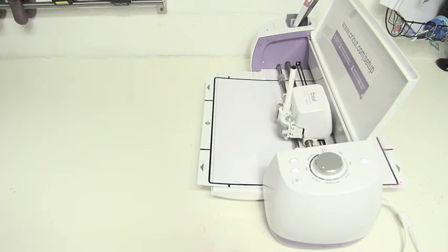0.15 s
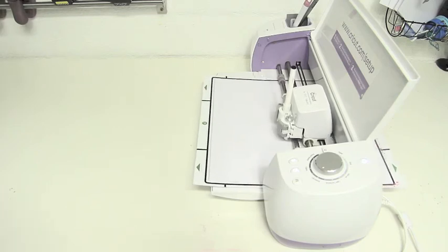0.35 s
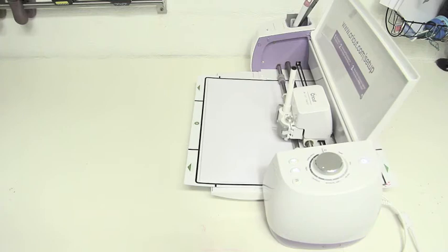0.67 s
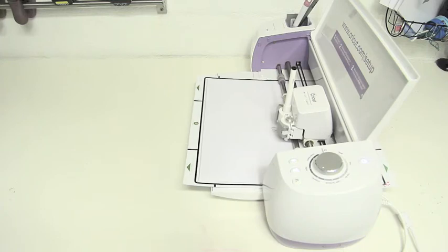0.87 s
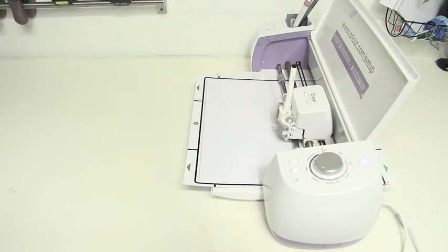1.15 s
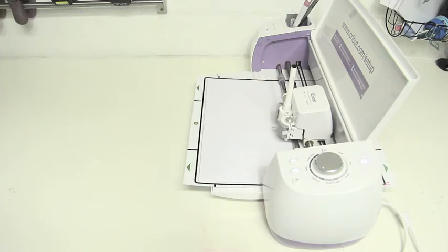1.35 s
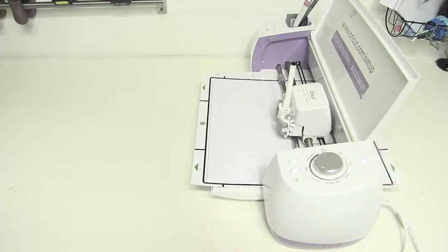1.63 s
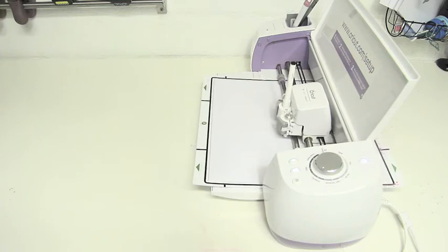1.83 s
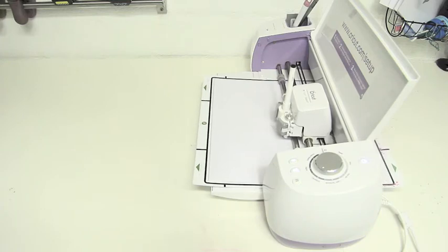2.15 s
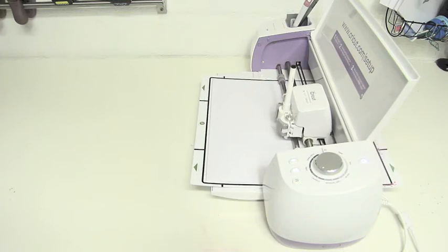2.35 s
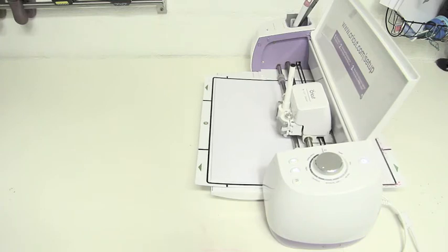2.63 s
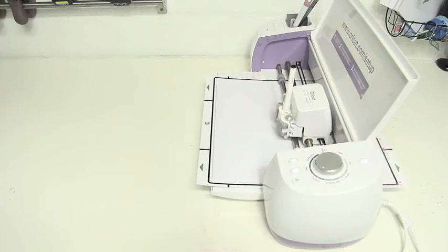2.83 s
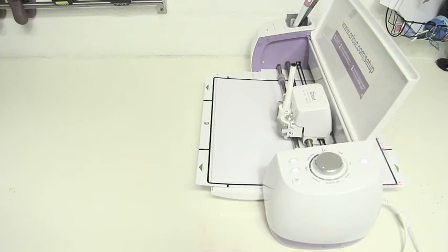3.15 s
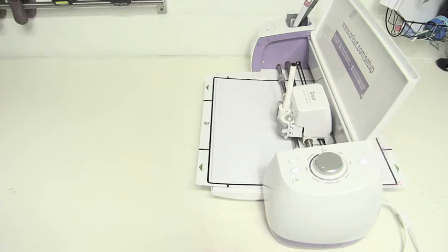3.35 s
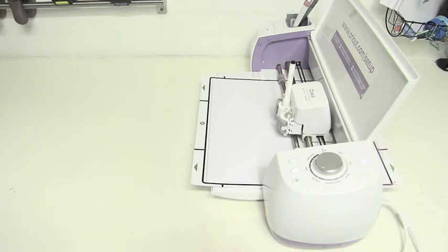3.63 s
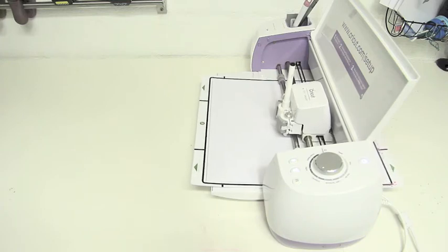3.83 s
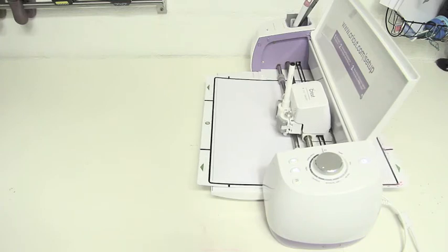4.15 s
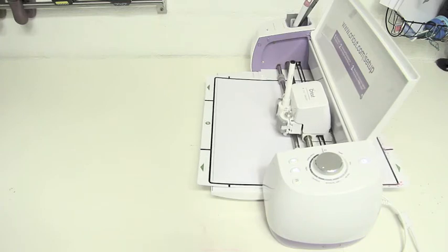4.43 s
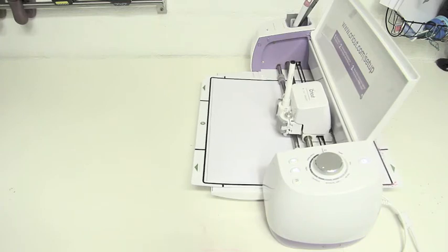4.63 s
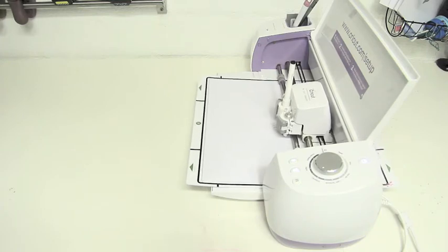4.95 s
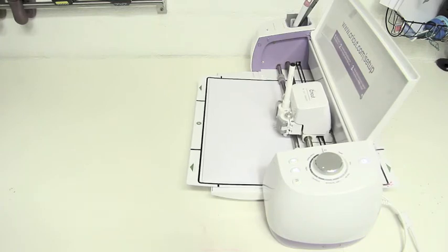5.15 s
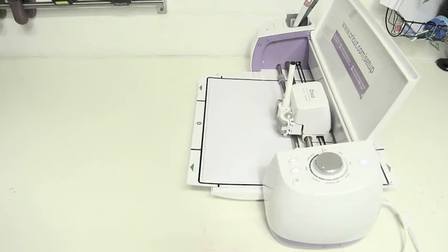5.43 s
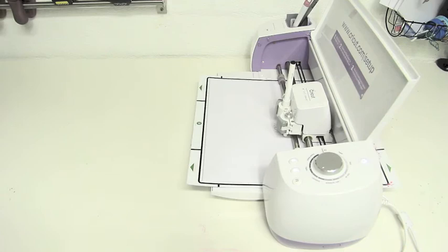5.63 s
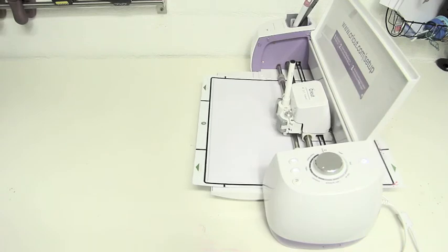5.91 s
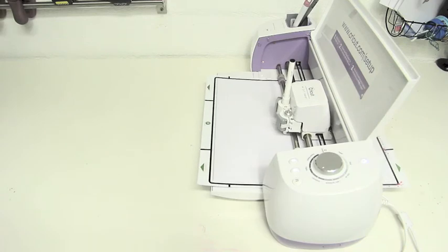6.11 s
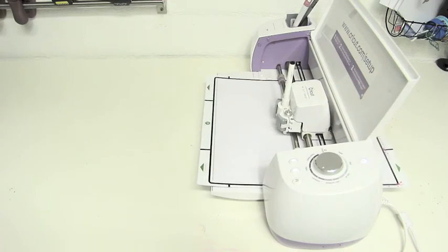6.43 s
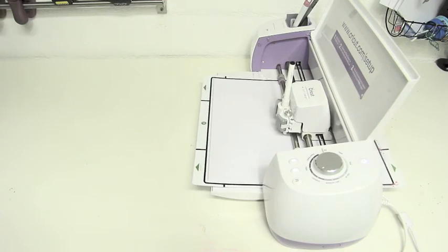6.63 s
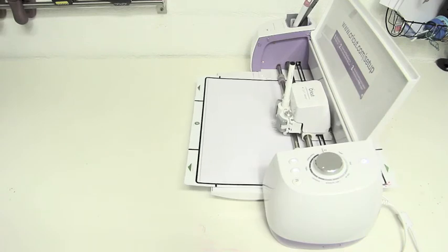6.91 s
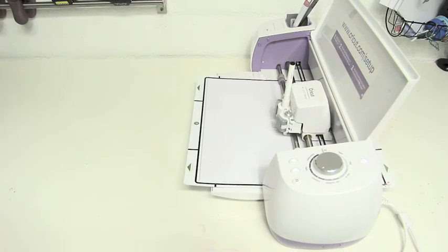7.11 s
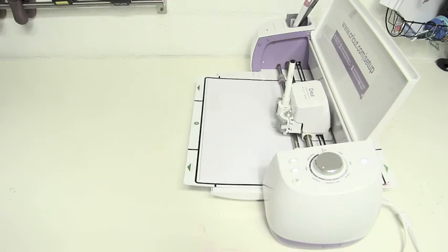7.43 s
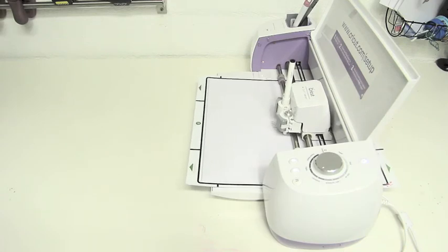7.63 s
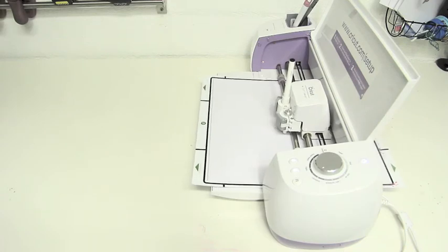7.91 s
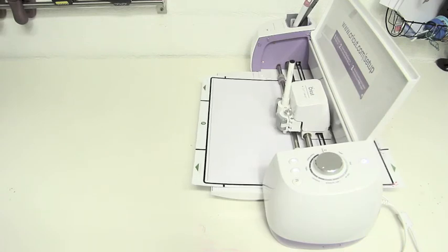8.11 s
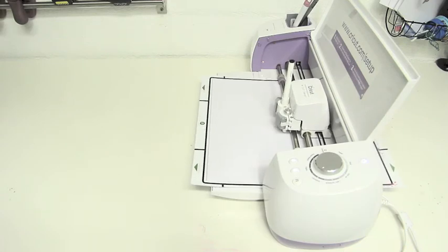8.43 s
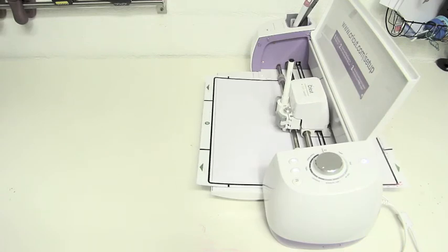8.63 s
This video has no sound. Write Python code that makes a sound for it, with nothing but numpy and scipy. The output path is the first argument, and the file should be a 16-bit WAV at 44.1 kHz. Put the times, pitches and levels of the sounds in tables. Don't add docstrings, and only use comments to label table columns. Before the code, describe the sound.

A small cutting machine on a table, miked at arm's length in a small quiet room. It starts with low gear creeping and a rattling buzz at 0.3-0.7 s. A dull double clack at 1.05 lifts the tool holder, then a harsher whir runs 1.45-1.7. A bright hard snap at 2.0 drops the holder; nudges and a short stroke follow around 2.2-2.8. Lift clacks come at 3.1, 4.4, 5.4 and 7.25; sharp drops at 3.75, 5.0, 6.35 and 8.1, the last loudest. Each has a brief 2 kHz coil whine, plastic ringing and sometimes a low table boom. Motor bursts fall at 3.6, 4.05, 4.55-4.8, a higher return at 5.85-6.1, feed at 6.6-6.9, another return at 7.65 with a tiny squeak, and a final stroke at 8.4-8.65. Light ticks fill gaps; soft hiss and a thin high whistle persist.

```python
import sys
import numpy as np
from scipy import signal
from scipy.fft import rfft, irfft, next_fast_len
from scipy.io import wavfile
from scipy.ndimage import map_coordinates

SR = 44100
rng = np.random.default_rng(int(sys.argv[2]) if len(sys.argv) > 2 else 0)


def bounce(signal):
    frames = np.transpose(np.atleast_2d(signal))
    limited = np.clip(frames, -1, 1)
    pcm = np.round(limited * 32767).astype(np.int16)
    wavfile.write(sys.argv[1], SR, pcm)


def makeup_ratio(level_db):
    decades = np.asarray(level_db, float) / 20
    return 10 ** decades


N = 386316


def unit(x):
    return x / np.sqrt(np.mean(x ** 2) + 1e-20)


def along(points, hz):
    f, value = np.transpose(points)
    return np.interp(np.log(hz + 1), np.log(f + 1), value)


def wobble(rate):
    knots = rng.standard_normal(int(N * rate / SR) + 4)
    return map_coordinates(knots, [np.arange(N) * rate / SR])


def gate(start, end, rise, fall):
    return np.interp(np.arange(N) / SR, [start, start + rise, end, end + fall], [0, 1, 1, 0])


def filtered(x, response):
    m = next_fast_len(len(x) + SR // 2)
    hz = np.fft.rfftfreq(m, 1 / SR)
    gain = np.interp(hz, hz[::8], response(hz[::8]))
    gain = gain / np.sqrt(np.mean(abs(gain) ** 2))
    return irfft(rfft(x, m) * gain, m)[:len(x)]


def body(modes, low_hz, high_hz, order=3):
    edges = signal.butter(order, [low_hz, high_hz], "band", output="sos", fs=SR)

    def response(f):
        ring = 0
        for k, (centre, width, db) in enumerate(modes):
            damping = 1j * f * width
            ring = ring + (-1) ** k * makeup_ratio(db) * damping / (centre * centre - f * f + damping)
        return ring * signal.sosfreqz(edges, f, fs=SR)[1]

    return response


def coloured(points):
    return lambda f: makeup_ratio(along(points, f))


# [start t/s, end t/s, roller gears level/dB]
CREEPS = [(-.01, 1.03, -47.5), (1.404, 1.74, -41), (2.1, 3.11, -46), (3.485, 3.735, -43), (3.86, 4.38, -47),
          (4.5, 4.83, -37), (5.13, 5.403, -47), (5.785, 6.1, -46), (6.46, 7.218, -47.5), (7.592, 7.85, -38),
          (8.23, 8.76, -46)]
# [from t/s, to t/s, roller gears level/dB, carriage gears level/dB, braking dB/s]
STROKES = [
    (.34, .68, -32.5, -45, 165),
    (1.45, 1.724, -31, -31, 190),
    (2.57, 2.712, -29, -31, 145),
    (3.565, 3.674, -31.5, -45.5, 230),
    (4.01, 4.088, -29, -29, 120),
    (4.54, 4.8, -30.5, -44, 220),
    (5.83, 6.078, -29, -27.5, 220),
    (6.575, 6.89, -31.5, -44.5, 120),
    (7.635, 7.838, -28, -29, 290),
    (8.445, 8.65, -29.5, -32, 150),
]
# [t/s, roller gears level/dB, extra bearing hiss/dB, rising dB/s, dying dB/s]
NUDGES = [(.02, -42, 2, 400, 150), (.085, -38.5, -5, 400, 70), (2.19, -38, 8, 100, 75),
          (2.364, -32, -1, 150, 220), (2.826, -31.5, 4, 2000, 130), (3.5, -38, 0, 600, 30),
          (3.86, -31, 0, 400, 200), (5.135, -40, 5, 400, 50), (6.46, -38, 0, 400, 110),
          (7.205, -39.5, 3, 250, 100), (8.23, -35.5, 6, 400, 60), (8.408, -27, 11, 3000, 450)]


def drive_levels():
    t = np.arange(N) / SR
    start_s, stop_s = .006, .03
    spin_up_db_per_s, carriage_steeper = 210, 1.3
    knee_db = -48

    def below(start, end, rise, fall):
        return -rise * np.maximum(start - t, 0) - fall * np.maximum(t - end, 0)

    def unpowered_db(start, end):
        return -50 * (1 - gate(start - start_s, end, start_s, stop_s))

    creep = np.max([db + unpowered_db(start, end) for start, end, db in CREEPS], axis=0)
    ready = np.max([unpowered_db(start, end + .25) for start, end, _ in CREEPS if end - start > .1], axis=0)
    ramps = [below(start, end, spin_up_db_per_s, braking) for start, end, _, _, braking in STROKES]
    roller = ready + np.max([row[2] + ramp for row, ramp in zip(STROKES, ramps)], axis=0)
    carriage = ready + np.max([row[3] + carriage_steeper * ramp for row, ramp in zip(STROKES, ramps)], axis=0)

    kicks = np.array([db + below(s, s, rising, dying) for s, db, _, rising, dying in NUDGES])
    kicks = kicks + np.minimum(creep - knee_db, 0)
    nudge = kicks.max(0)
    fizz = np.max([kick + row[2] for row, kick in zip(NUDGES, kicks)], axis=0)

    gears = 10 * np.log10(makeup_ratio(roller) ** 2 + makeup_ratio(carriage) ** 2 + makeup_ratio(creep) ** 2)
    over = gears - knee_db
    gear_rumble = -42.5 + np.where(over > 0, .38, 1.3) * over
    nudge_rumble = np.minimum(np.maximum(nudge, fizz), -33) - 2.5
    rumble = np.maximum(gear_rumble, nudge_rumble)
    all_roller = np.max([roller, creep - 4, nudge], axis=0)
    all_carriage = np.max([carriage, creep - 19, nudge - 15], axis=0)
    hiss = np.maximum(gears, fizz) - 12.5
    guide = creep - 2.5
    return rumble, all_roller, all_carriage, hiss, guide


# [start t/s, end t/s, shaft f/Hz, tone level/dB]
FEED = [
    (.34, .72, 34.1, 0),
    (6.57, 6.94, 34.1, 0),
]
SLANT = [
    (1.44, 1.76, 34.3, 0),
    (2.54, 2.76, 34.1, 0),
    (3.99, 4.15, 34.2, -1),
    (8.45, 8.7, 34.3, -2),
]
BACK = [
    (5.835, 6.13, 36.15, 0),
    (7.63, 7.89, 36.3, -2),
]
PULL = [
    (4.53, 4.85, 37.3, 0),
]


def shaft_turns(roller_db):
    shaft_hz = 33
    speed = shaft_hz * makeup_ratio(np.clip(.35 * (roller_db + 33), -9, 0)) * (1 + .06 * wobble(5))
    for start, end, hz, _ in [*FEED, *SLANT, *BACK, *PULL]:
        speed += (hz - speed) * gate(start - .04, end, .04, .04)
    return np.cumsum(speed * (1 + .002 * wobble(14))) / SR


# [f/Hz, width f/Hz, level/dB]
BASE = [(62, 17, -12), (94.3, 18, -5.5), (130, 22, -1.5), (171.3, 25, -4), (240, 30, -3), (285, 30, -2)]
HOUSING = [(365, 55, -3), (452, 65, 1), (560, 70, -5), (650, 80, -5)]
ROLLERS = [(907, 72, -8), (1101, 64, -1), (1174, 35, 0.5), (1440, 110, -2), (1675, 204, -8)]
CARRIAGE = [(1951, 80, 1), (2040, 80, 1.1), (2140, 150, -7), (2420, 46, -14)]
# [f/Hz, width f/Hz, level/dB]
RAILS = [(3850, 76, 0), (4160, 73, 1.7), (4480, 210, 0.5), (5500, 280, -7.5), (6420, 320, -7.5),
         (7200, 120, -5.5)]
SLEEVE = [(8600, 1000, 0), (9600, 1200, 1), (12100, 1200, -7)]
BELT = [(2470, 97, 0.1)]
# [f/Hz, level/dB per Hz]
BEARINGS = [(1350, -42), (2300, -1), (2570, -3.5), (3210, -7.5), (3500, -10), (4340, -12.5), (5860, -17.5),
            (6920, -24.5), (7860, -27.5), (10200, -45), (12500, -33), (15300, -28)]


def gear_noise(turns, rumble_db, roller_db, carriage_db, hiss_db, guide_db):
    teeth = 11

    def during(strokes, lead):
        return sum(gate(start - lead, end, .03, .05) for start, end, *_ in strokes)

    base_db = rumble_db - 4.8 - 5 * during(BACK, .03) - 4 * during(FEED, .03)
    hiss_db = hiss_db - 2.5 * during(FEED + PULL, .03)
    sleeve_db = roller_db - 24.5 - .35 * np.maximum(carriage_db + 45, 0)
    panel_db = rumble_db - 7.5 + np.minimum(.4 * (roller_db + 35), 0)
    roller_db = roller_db - 2 * during(BACK, 0)
    panel, mat_guide = [(784, 70, 0)], [(1365, 120, 0)]
    # level/dB, response, grit/dB, swing per turn/dB, tenths of the power that recur each turn
    parts = [(base_db, body(BASE, 51, 400), 1.1, 1.1, 0),
             (rumble_db - 2.3, body(HOUSING, 280, 910), 1.1, 1.1, 4),
             (roller_db, body(ROLLERS, 835, 1860, order=5), 1.2, 1.1, 5.01),
             (carriage_db - 1.5, body(CARRIAGE, 1640, 2500), 3.2, 2.1, 4),
             (hiss_db, coloured(BEARINGS), 1.8, 2.4, 1),
             (hiss_db - 10.5, body(RAILS, 2900, 7600), 2.5, 3.1, 1),
             (sleeve_db, body(SLEEVE, 7400, 13000), 1.5, 1.1, 1),
             (rumble_db - 18, body(BELT, 2170, 3350), 1.5, 1.1, 1),
             (panel_db, body(panel, 550, 1000), 1.1, 1.1, 2),
             (guide_db, body(mat_guide, 1100, 1700), 1.2, 1.1, 2)]
    total = 0
    for level_db, part, grit_db, swing_db, repeat in parts:
        one_turn = unit(irfft(np.exp(2j * np.pi * rng.uniform(size=651))))
        wear = one_turn[(turns % 1 * 1300).astype(int)]
        source = np.sqrt(repeat / 10) * wear + np.sqrt(1 - repeat / 10) * rng.standard_normal(N)
        mesh_db = 2.1 * np.cos(2 * np.pi * teeth * turns)
        turn_db = swing_db * np.cos(2 * np.pi * turns)
        beat = makeup_ratio(mesh_db + turn_db + grit_db * wobble(70))
        total = total + makeup_ratio(level_db - 0.6) * unit(filtered(beat * source, part))
    return total


# [multiple of shaft f, level/dB]
FEED_TONES = [(5, -42), (11, -49), (22, -49), (33, -36.5), (42.3, -41.5), (44, -41)]
SLANT_TONES = [(5, -43), (8.2, -52), (13, -48), (22, -42), (23.3, -46), (210, -66), (32.7, -37), (44, -37),
               (56, -35)]
BACK_TONES = [(11, -41), (15, -44), (22, -36), (31, -43), (33, -44), (35, -44), (38, -44), (44, -36),
              (55, -38), (56, -35), (66, -48)]
PULL_TONES = [(4, -48), (11, -44), (15, -44), (16, -47), (22, -45), (25, -45), (34.2, -43), (37.1, -44),
              (43, -43), (45.2, -47)]


def gear_tones(turns):
    total = np.zeros(N)
    kinds = [(FEED, FEED_TONES), (SLANT, SLANT_TONES), (BACK, BACK_TONES), (PULL, PULL_TONES)]
    for strokes, tones in kinds:
        on = sum(makeup_ratio(db) * gate(start - .01, end - .035, 0.02, 0.06) for start, end, _, db in strokes)
        span = on > 0
        for multiple, tone_db in tones:
            flutter = makeup_ratio(tone_db + 2.5 + 1.7 * wobble(30)[span])
            total[span] += on[span] * flutter * np.sin(2 * np.pi * (multiple * turns[span] + rng.uniform()))
    return total


# [t/s, crack peak level/dB, rebound level/dB, upper table mode level/dB, lower level/dB]
DROPS = [
    (1.9996, -12, -37, -34, -60),
    (3.7484, -13, -29, -35.5, -39),
    (5.0175, -12.5, -26.5, -38, -60),
    (6.3457, -13.5, -32, -34, -60),
    (8.1105, -11.5, -25, -35, -60),
]
# [t/s, crack peak level/dB, flight to its stop/s, upper table mode level/dB, lower level/dB]
LIFTS = [
    (1.0559, -14.5, .0689, -55, -46),
    (3.1358, -15.5, .0632, -38, -46),
    (4.4075, -16, .0627, -33.5, -42.5),
    (5.4298, -15.5, .0624, -55, -39.5),
    (7.244, -16, .0646, -55, -46),
]
# [t/s, crack peak level/dB, knock above it/dB, thud above it/dB]
JOLTS = [(1.406, -31, 3, -4), (1.4466, -38, 5, -6), (1.652, -32, 2, -14), (1.6613, -25.5, 1, -14),
         (1.7274, -33, 7, -2), (2.159, -29.5, -3, -7), (2.176, -29.5, 0, -12), (2.3974, -43, 6, -3),
         (2.467, -40, 12, 7), (2.822, -36, 8, -10), (3.483, -35, -2, 2), (3.6017, -34, 4, -15),
         (3.68, -30, 0, -6), (3.692, -28, -2, -8), (3.982, -38, 6, -8), (4.0684, -43.5, 5.5, -2),
         (5.785, -42, 2, 8), (5.8182, -41.5, 7, 12), (7.1875, -46.5, 13, -4.5), (7.5914, -44, 2, 9),
         (7.6255, -31, 8, -2), (8.4075, -27, 10, 0)]
# [t/s, peak level/dB]
TICKS = [(.83, -40), (.87, -40), (.915, -40), (.955, -41), (1.343, -40), (1.3484, -45), (3.099, -40),
         (3.4461, -40.5), (3.5, -35), (4.185, -39), (4.25, -40), (4.895, -41), (5.317, -38), (5.692, -40.5),
         (5.7344, -41.5), (5.7765, -33), (6.1994, -42), (6.2422, -41), (6.972, -37), (7.058, -40),
         (7.1, -41), (7.998, -40), (8.0406, -41), (8.0785, -41)]
# [f/Hz, level/dB per Hz]
CRACK = [(1290, -35), (2200, -13.5), (2510, -5), (3490, -7.5), (4110, -4), (5160, -6.5), (7430, -9),
         (9630, -9.5), (10400, -12.5), (15300, -25)]
SNAP = [(1290, -15), (2200, -6.5), (2440, 0.5), (3790, -7), (4390, -0.5), (5460, -4.5), (8880, -1),
        (9950, -1.5), (12900, -8.5), (15300, -16)]
PLINK = [(2500, -9), (4800, 1), (7000, -10), (14000, -16)]
SEAT_S, SEAT_DB, RETURN_DB = .0089, -.3, -3.2
COIL_DB = -34


def holder():
    drop, seat, rebound = (-21.5, -23, .062, .001), (-13.5, -22, .17, .0012), (5.5, 1, .075, .005)
    lift, back_home = (-11, -19, .145, .0022), (-9, -20, .078, .003)
    rebound_s = .085
    ticks = [(s, db, -9, -30, .015, .0005) for s, db in TICKS]
    stirs = [(s - .003, COIL_DB - 3, -20, -20, .08, .002) for s in coil_starts()]
    lifts = [(s, db, *lift) for s, db, *_ in LIFTS]
    rebounds = [(s + rebound_s, db, *rebound) for s, _, db, *_ in DROPS]
    jolts = [(*jolt, .06, .0022) for jolt in JOLTS]
    drops = [(s, db, *drop) for s, db, *_ in DROPS]
    seats = [(s + SEAT_S, db + SEAT_DB, *seat) for s, db, *_ in DROPS]
    returns = [(s + flight, db + RETURN_DB, *back_home) for s, db, flight, *_ in LIFTS]
    dull = blows([*lifts, *rebounds, *jolts], CRACK, lag=0)
    light = blows([*ticks, *stirs], PLINK, lag=0)
    bright = blows([*drops, *seats], SNAP, lag=0.0037)
    return dull + light + rings() + squeaks() + bright + blows(returns, CRACK, lag=0.0082)


# [f/Hz, width f/Hz, level/dB]
KNOCK = [(783, 88, -3.5), (1064, 137, 0.4), (1264, 360, -4.5), (1690, 290, -9.5), (2700, 840, -5.5)]
THUD = [(62, 6.6, -6), (134, 18.5, 0.2), (237, 20, 1.5), (435, 106, 0), (623, 160, -9.5)]


def blows(contacts, crack, lag):
    t = np.arange(SR // 2) / SR
    push = np.zeros((3, N + SR))
    strike = 1 + 1.1 * makeup_ratio(-60 * t / .05)
    for s, db, knock_db, thud_db, t60, rise in contacts:
        layers = zip(push, [0, lag, lag], [-9, knock_db - 1, thud_db - 1], [1, 1.3, 1.6])
        for layer, late, above_db, slow in layers:
            decay = makeup_ratio(db + above_db - 60 * t / (slow * t60))
            onset = 1 - np.exp(-t / (slow * rise))
            layer[round((s + late) * SR):][:len(t)] += strike * decay * onset
    parts = [coloured(crack), body(KNOCK, 600, 2180), body(THUD, 49, 850)]
    chatter = makeup_ratio(0.83 * wobble(400))
    return sum(filtered(layer[:N] * chatter * rng.standard_normal(N), part) for layer, part in zip(push, parts))


# [f/Hz, level above the crack/dB, t60/s]
SEAT_RING = [(256, -25, .2), (380, -16, .18), (442, -14.5, .24), (520, -19, .2), (640, -17, .15),
             (790, -21, .22), (1080, -15.5, .22), (1300, -16, .2), (2550, -20, .16), (2840, -18, .17),
             (4350, -24, .14), (6740, -29, .12), (8200, -27, .12)]
LIFT_RING = [(165, -18, .16), (250, -16.5, .26), (292, -19, .17), (380, -22, .17), (436, -14, .2),
             (510, -20, .24), (620, -16, .08), (750, -16, .28), (900, -17, .16), (1055, -15, .2),
             (1150, -21, .25), (2500, -22, .22)]
RETURN_RING = [(250, -22, .12), (452, -15, .19), (600, -18, .08), (760, -21, .2), (900, -21, .17),
               (1090, -13, .16), (2520, -18, .12), (4300, -25, .1)]


def rings():
    out, t = np.zeros(N + SR), np.arange(SR // 5) / SR
    spread, rise_s = .02, .005
    seats = [(s + SEAT_S, db) for s, db, *_ in DROPS]
    lifts = [(s, db) for s, db, *_ in LIFTS]
    returns = [(s + flight + .006, db + RETURN_DB) for s, db, flight, *_ in LIFTS]
    for modes, contacts in [(SEAT_RING, seats), (LIFT_RING, lifts), (RETURN_RING, returns)]:
        hz, level_db, t60 = np.transpose(modes)[:, :, None]
        for s, db in contacts:
            detune, phase = rng.uniform(-1, 1, (2, 3, len(modes), 1))
            cluster = np.sin(2 * np.pi * hz * (1 + spread * detune) * t + np.pi * phase).sum(0)
            ring = (makeup_ratio(db + level_db - 4.5 - 60 * t / t60) * cluster).sum(0)
            out[round(s * SR):][:len(t)] += ring * (1 - np.exp(-t / rise_s))
    return out[:N]


# [t/s, length/s, level/dB, from f/Hz, to f/Hz]
SQUEAKS = [
    (3.49, .022, -46, 4400, 4600),
    (2.14, .02, -36, 1120, 1100),
    (5.795, .004, -52, 9000, 9000),
    (5.82, .004, -48, 10000, 9500),
    (5.868, .005, -44, 10500, 9800),
    (7.644, .014, -27, 1400, 1400),
    (8.198, .013, -27, 1380, 1330),
]


def squeaks():
    out = np.zeros(N)
    for s, length, db, from_hz, to_hz in SQUEAKS:
        n = round(length * SR)
        glide = np.cumsum(np.linspace(from_hz, to_hz, n)) / SR
        out[round(s * SR):][:n] += makeup_ratio(db) * np.hanning(n) ** .5 * np.sin(2 * np.pi * glide)
    return out


def coil_starts():
    lift_lead_s = .0176
    return [s for s, *_ in DROPS] + [s - lift_lead_s for s, *_ in LIFTS]


# [f/Hz, level while driving/dB, level while holding/dB]
WHINE = [(2002, -3, -20), (4004, -8, -21), (6006, -21, -40)]


def coil():
    t = np.arange(N) / SR
    drive = sum(gate(s, s + 0.083, 0.0066, 0.0036) for s in coil_starts())
    hold = sum(gate(s + 0.115, s + .185, .01, .01) for s in coil_starts())
    whine = 0
    for hz, drive_db, hold_db in WHINE:
        strength = makeup_ratio(drive_db + 1.5) * drive + makeup_ratio(hold_db - 5.5) * hold
        whine = whine + strength * np.sin(2 * np.pi * hz * t)
    return makeup_ratio(COIL_DB) * whine


# [f/Hz, t60/s, delay after a drop/s, delay after a lift/s]
TABLE_MODES = [(130, .36, .025, .06), (62, .34, .022, .065)]


def table():
    boom, t = np.zeros(N + SR), np.arange(SR // 2) / SR
    swell = 1 - np.exp(-t / 0.018)
    for which, contacts in enumerate([DROPS, LIFTS]):
        for s, _, _, *levels_db in contacts:
            for db, (hz, t60, *delay) in zip(levels_db, TABLE_MODES):
                mode = makeup_ratio(db + 6.5 - 60 * t / t60) * swell * np.sin(2 * np.pi * hz * t)
                boom[round((s + delay[which]) * SR):][:len(t)] += mode
    return boom[:N]


# [f/Hz, t60/s]
ROOM = [(100, 0.51), (1000, 0.26), (4000, 0.34), (14000, 0.15)]


def room(x):
    hz, t, z = signal.stft(rng.standard_normal(SR // 2), SR, nperseg=256)
    decay = makeup_ratio(-60 * t / along(ROOM, hz)[:, None])
    tail = signal.istft(z * decay, SR, nperseg=256)[1]
    delayed = np.pad(x, (200, 0))
    return signal.fftconvolve(delayed, tail / np.linalg.norm(tail))[:N]


# [f/Hz, level/dB per Hz]
AIR = [(24, -30), (40, -5), (142, -1), (212, 3.5), (300, -6), (1050, -5.5), (1250, 2), (1510, 4.5),
       (1890, -10.5), (4300, -15), (4750, -13.5), (6570, -17), (8630, -21), (10000, -22), (12300, -22),
       (14400, -26), (15300, -18)]
# [f/Hz, level/dB]
WHISTLE = [(15628, -60), (15660, -71.5)]


def air():
    t = np.arange(N) / SR
    whistle = sum(makeup_ratio(db + 3 + .8 * wobble(12)) * np.sin(2 * np.pi * hz * t) for hz, db in WHISTLE)
    return makeup_ratio(-52) * filtered(rng.standard_normal(N), coloured(AIR)) + whistle


def scene():
    levels_db = drive_levels()
    turns = shaft_turns(levels_db[1])
    sudden = holder()
    rattle = gear_noise(turns, *levels_db)
    tones = gear_tones(turns) + coil()
    echo = room(makeup_ratio(-6) * sudden + makeup_ratio(-7.5) * rattle + makeup_ratio(-23) * tones)
    return (sudden + rattle + tones + table() + echo + air())[None]


def low_pass(x):
    return signal.sosfilt(signal.butter(12, 16980, fs=SR, output="sos"), x)


# [f/Hz, level/dB]
MICROPHONE = [(20, -30), (45, 0), (60, 0), (15700, 0.1), (15900, -28), (17000, -48)]


def record(dry):
    limited = dry[0] / (1 + abs(dry[0] / .65) ** 4) ** (1 / 4)
    mix = 0.79 * filtered(limited, coloured(MICROPHONE))[None]
    return low_pass(mix)


dry = scene()
out = record(dry)
bounce(out)
```